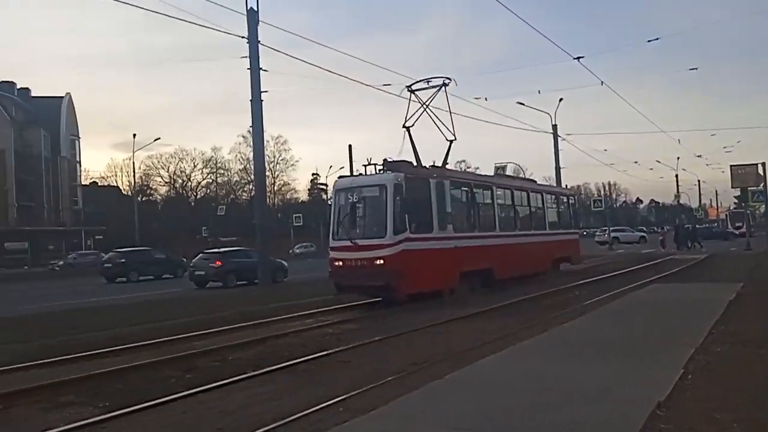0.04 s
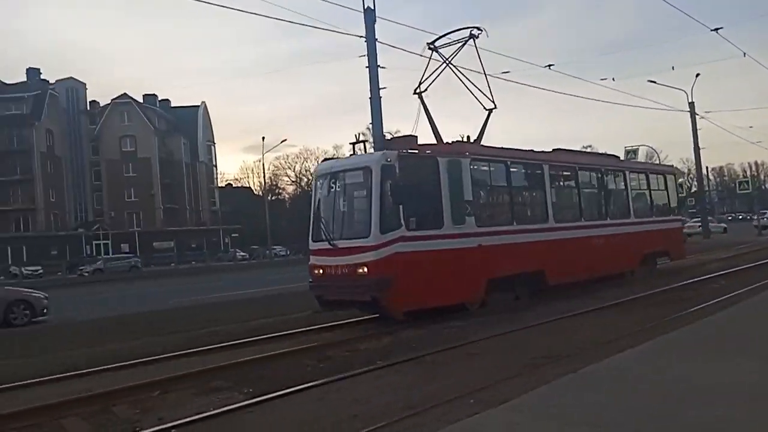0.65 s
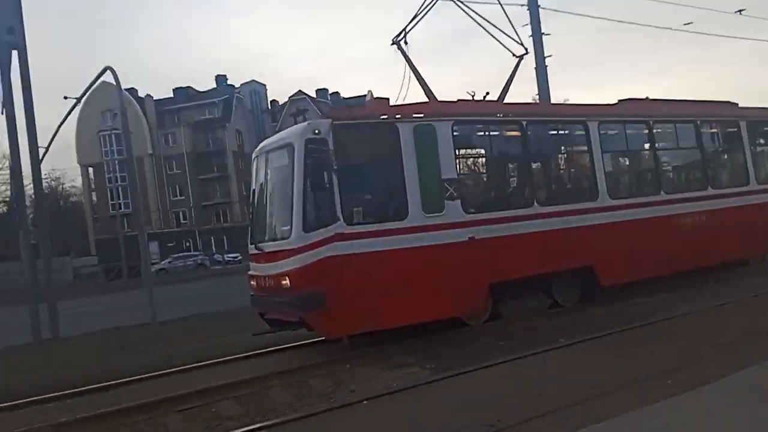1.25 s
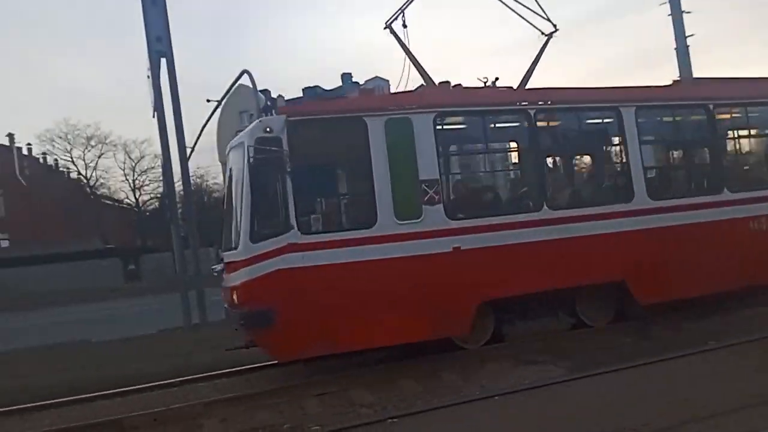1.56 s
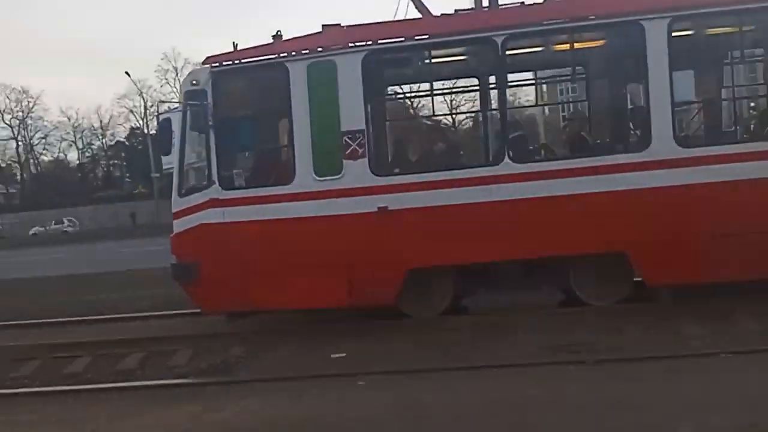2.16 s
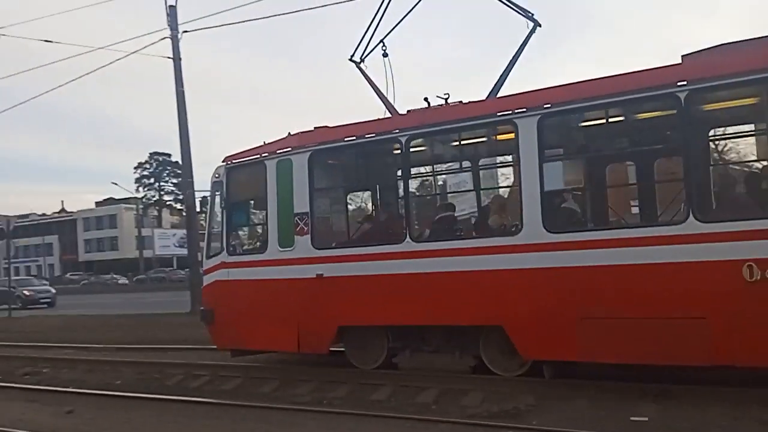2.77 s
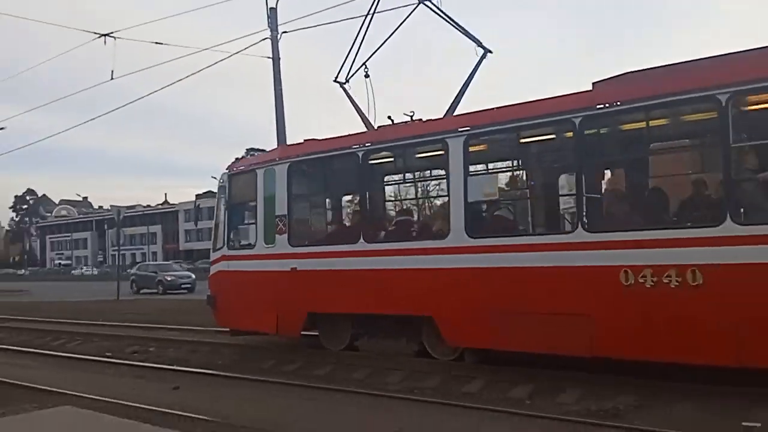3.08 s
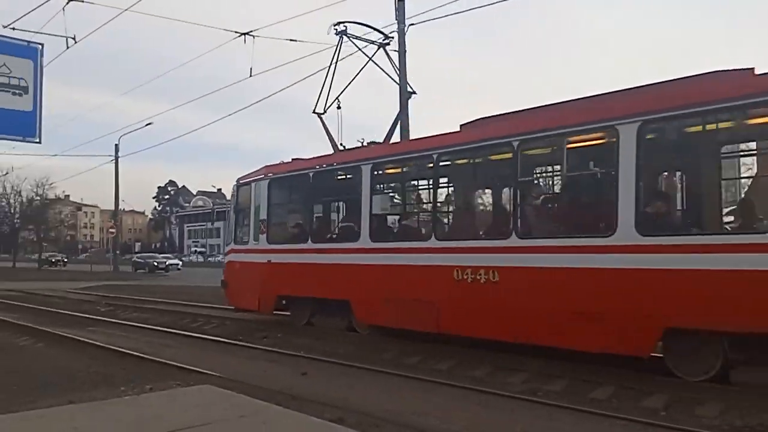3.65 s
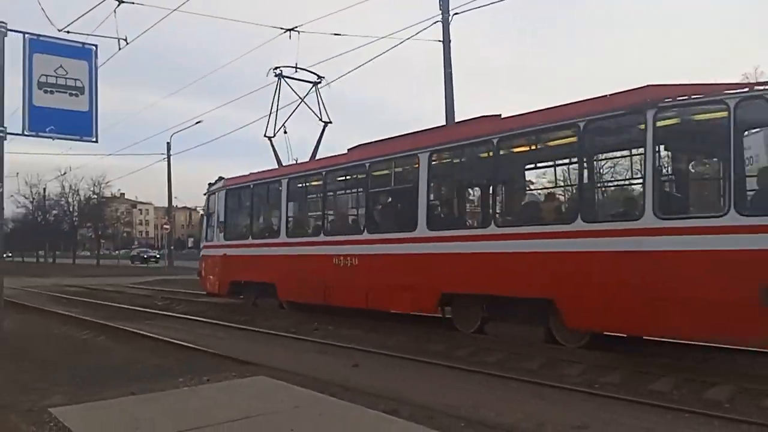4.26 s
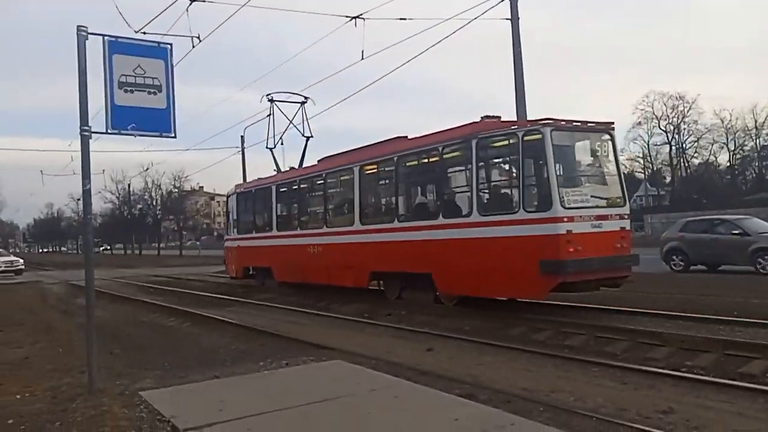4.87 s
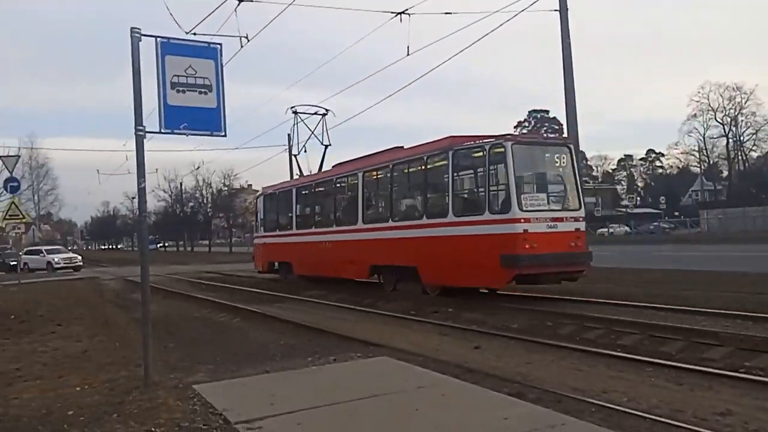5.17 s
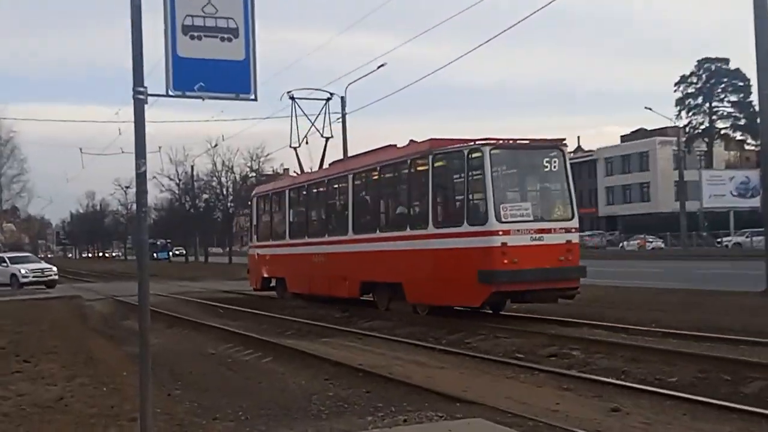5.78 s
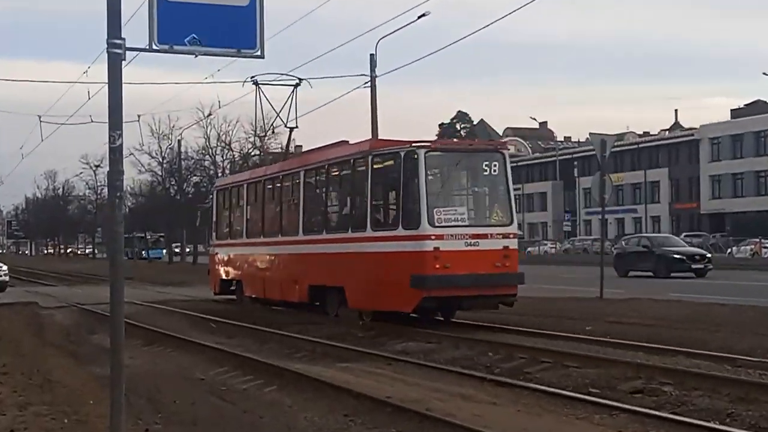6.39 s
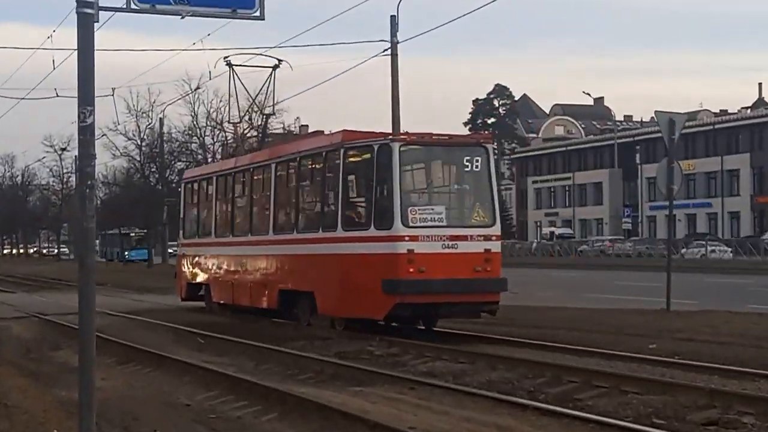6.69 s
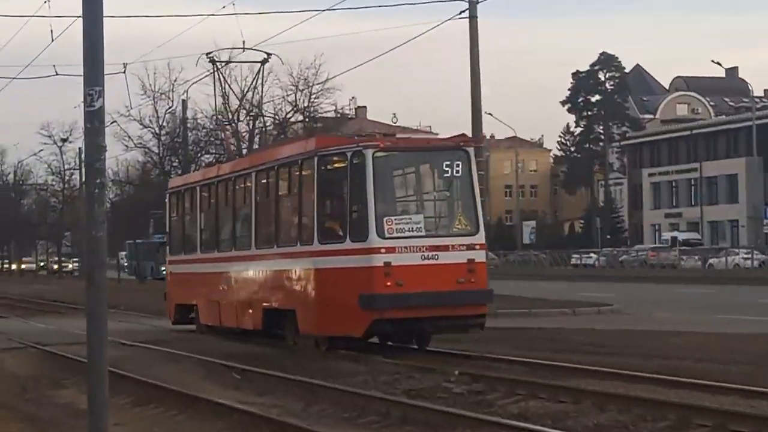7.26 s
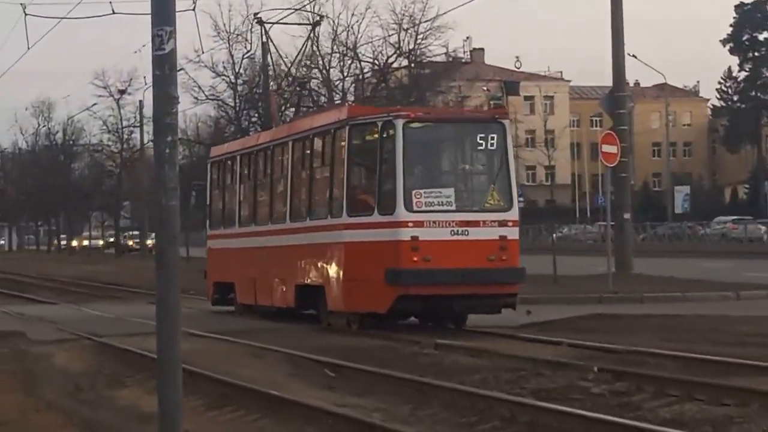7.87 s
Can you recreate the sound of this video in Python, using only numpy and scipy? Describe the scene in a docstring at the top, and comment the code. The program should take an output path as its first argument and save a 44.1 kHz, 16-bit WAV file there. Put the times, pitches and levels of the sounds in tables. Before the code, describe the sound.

Steel tram wheels rumble, ring and clack past on a street track, fading into distant road traffic.

```python
"""Tram passing on street track

One microphone in an open street, a few metres from the rails: a two-bogie tram rolls by and draws off.
Rough rail shakes the car body and sets the steel wheels ringing; their pitch sinks as the car passes.
Axles clack over rail joints, flanges rub and loose fittings chink. Road traffic lies far behind."""
import sys
import numpy as np
from scipy import signal
from scipy.fft import rfft, irfft, next_fast_len
from scipy.io import wavfile
from scipy.ndimage import uniform_filter1d, map_coordinates

SR = 44100
rng = np.random.default_rng(int(sys.argv[2]) if len(sys.argv) > 2 else 0)


def to_wav(sig):
    """Store sig (one row per channel, or 1-D mono) as 16-bit WAV at the path in sys.argv[1].

    Samples outside -1..1 are clipped; the rate is SR.
    """
    pcm = np.clip(np.atleast_2d(sig), -1, 1) * 32767
    pcm = np.round(pcm).astype(np.int16)
    wavfile.write(sys.argv[1], SR, pcm.T)  # frames by channels


N = 349713
T = np.arange(N) / SR
PASS_S = 3.1  # the car is closest to the microphone

# rolling noise, following track state and distance: t/s, body rumble/dB, rail roar/dB, flange sizzle/dB
ROLLING_LEVELS = [(0, -34.5, -36.5, -39.5), (0.2, -30, -38.5, -43.5), (0.6, -31.5, -37.5, -44.5),
                  (0.9, -33.5, -39.5, -43), (1.08, -28.5, -39.5, -45), (1.45, -30, -41, -43),
                  (1.85, -33.5, -41.5, -44), (2.2, -29, -36, -42.5), (2.62, -36.5, -42, -47.5),
                  (3.1, -31.5, -38.5, -46.5), (3.48, -31, -43.5, -51), (3.65, -39.5, -44, -53),
                  (4.15, -34, -42.5, -51), (4.45, -39, -48, -56), (5.45, -42.5, -50, -55),
                  (5.9, -40, -47.5, -53), (6.7, -45, -48, -56), (7.93, -45.5, -48, -54)]
# spectrum of the rail under the rear bogie: f/Hz, level/dB
REAR_RAIL_SPECTRUM = [(200, -20), (510, -5.5), (620, 4), (780, 3), (1130, -5), (1330, -5), (1650, -1.5),
                      (2100, -6.5), (2350, -1.5), (2550, -13), (2950, -8.5), (3700, -22), (5000, -22.5),
                      (16000, -45)]
# spectrum of a thud through the car: f/Hz, level/dB
THUD_SPECTRUM = [(25, -23), (60, -25), (100, 4.5), (240, 6.5), (350, -0.5), (500, -9.5), (1000, -37),
                 (4000, -78)]
# resonances of a bogie frame: f/Hz, width/Hz, level/dB
FRAME_MODES = [(344, 49, 3.5), (609, 50, -2), (756, 33, 2), (866, 18, -0.5), (1057, 76, -4.5),
               (1167, 30, 1), (1480, 77, -4), (1657, 17, -5.5), (2090, 60, -3), (2325, 30, 0.5),
               (2500, 44, -5.5), (3080, 18, -33), (3220, 41, -13.5)]
# lowest wheel mode, split between the wheels: f/Hz, width/Hz, level/dB
LOW_WHEEL_MODES = [(1806, 53.6, -2.5), (1883, 111, -7.5), (1996, 155, -12.5)]
# high modes of the front wheels: f/Hz, width/Hz, level/dB
FRONT_RIM_MODES = [(3536, 25, -15.5), (4100, 60, -8), (4550, 16, -3.5), (5435, 54, 4), (5510, 120, 1.5),
                   (5680, 76, -6.5), (6180, 220, -4), (6270, 37, -9.5), (6600, 36, -5), (6800, 70, -9),
                   (7600, 66, -7)]


def amp(db):
    """Decibels to gain."""
    return 10 ** (np.asarray(db) / 20)


def unit(x):
    """Scale to rms 1."""
    return x / np.sqrt(np.mean(x ** 2) + 1e-20)


def curves(rows):
    """One value per sample for each column after the time."""
    times, *columns = np.transpose(rows)
    return [np.interp(T, times, column) for column in columns]


def wobble(rate):
    """A smooth random curve, rate knots a second."""
    knots = rng.standard_normal(int(T[-1] * rate) + 4)
    coarse = T[::100]
    return np.interp(T, coarse, map_coordinates(knots, [coarse * rate], order=3))


def white():
    """Fresh white noise."""
    return rng.standard_normal(N)


def band(points):
    """Gain against frequency from rows of f/Hz, level/dB."""
    hz, db = np.transpose(points)
    return lambda f: amp(np.interp(np.log(f + 1), np.log(hz), db))


def steel(modes, lo_hz, hi_hz):
    """Response of resonances that radiate only between two frequencies."""
    def response(f):
        ringing = sum((-1) ** k * amp(db) * 1j * f * width / (hz * hz - f * f + 1j * f * width)
                      for k, (hz, width, db) in enumerate(modes))
        return ringing / np.sqrt((1 + (lo_hz / (f + 1)) ** 16) * (1 + (f / hi_hz) ** 40))
    return response


def filtered(x, response):
    """Colour x, keeping the power of a white input."""
    size = next_fast_len(N + 8192)
    gain = response(np.fft.rfftfreq(size, 1 / SR))
    return irfft(rfft(x, size) * gain / np.sqrt(np.mean(abs(gain) ** 2)), size)[:N]


def blows(times, levels_db, rise, t60):
    """Bursts of noise that swell quickly and die away; rise and t60 in seconds."""
    power, t = np.zeros(N + SR), np.arange(SR // 2) / SR
    shape = (1 - np.exp(-t / rise)) * amp(-60 * t / t60)
    for s, db in zip(times, levels_db):
        power[round(s * SR):][:len(t)] += (amp(db) * shape / shape.max()) ** 2
    return np.sqrt(power[:N]) * white()


def spells(rows, attack, release):
    """Gain of sounds that swell, hold and die away; attack and release in seconds."""
    power = np.zeros(N)
    for start, length, db in rows:
        rise = 1 - np.exp(-np.maximum(T - start, 0) / attack)
        fall = np.exp(-np.maximum(T - start - length, 0) / release)
        power += (amp(db) * rise * fall) ** 2
    return np.sqrt(power)


def nearness(closest_s, length_s):
    """Gain of a passing source, one over its distance from the microphone."""
    return 1 / np.hypot(1, (T - closest_s) / length_s)


def doppler(x, mach=0.018, length_s=0.99):
    """Pitch is high on the approach and low once the car is past."""
    speed = 1 - mach * np.tanh((T - PASS_S) / length_s)
    return map_coordinates(x, [np.cumsum(speed)], order=3, mode="wrap")


def dulled(x, edge_hz, near_db, length_s):
    """The treble of the rail reaches the microphone only while the car is close."""
    low = signal.sosfiltfilt(signal.butter(4, edge_hz, fs=SR, output="sos"), x)
    return low + amp(near_db) * nearness(PASS_S, length_s) * (x - low)


def bogies(front, rear, swap_s=3.44, length_s=0.18):
    """The front bogie is the nearer one first, then the rear."""
    rear_share = (1 + np.tanh((T - swap_s) / length_s)) / 2
    return np.sqrt(1 - rear_share) * unit(front) + np.sqrt(rear_share) * unit(rear)


def turn_db(turn_s=0.257, heaviest_s=2.245):
    """Slightly uneven wheels bear down once a turn, most plainly at close range."""
    angle = 2 * np.pi * (T - heaviest_s) / turn_s
    return 2.5 * (np.cos(angle) + 0.3 * np.cos(2 * angle)) * nearness(closest_s=2.9, length_s=2.6) ** 2


def contact(rate, spread_db, share):
    """Force at the tread: fine roughness, with a share of the power in knocks on grit and pits."""
    hit = rng.random(N) < rate / SR
    roughness, knocks = white(), np.zeros(N)
    knocks[hit] = amp(spread_db * np.clip(roughness[hit], -2, 2))
    return np.sqrt(share) * unit(knocks - knocks.mean()) + np.sqrt(1 - share) * roughness


def wandering_modes(modes, flare_db, knock_rate):
    """The contact patch wanders over the tread, so each mode flares up and fades by itself."""
    out = np.zeros(N)
    for hz, width, db in modes:
        force = contact(rate=knock_rate, spread_db=4, share=0.6)
        ring = signal.lfilter(*signal.iirpeak(hz, hz / width, SR), force)
        out += amp(db + flare_db * wobble(22)) * unit(ring)
    return doppler(out)


def rolling():
    """Wheels on rough rail: the body rumbles, the rail roars, the bogie frames clatter."""
    # spectra of the car body, the rail under the front bogie and the frame's radiation: f/Hz, level/dB
    body_spectrum = [(20, -42), (40, -34), (60, -17), (80, 0.5), (110, 1), (160, -0.5), (200, 0.5),
                     (230, -11), (275, -5), (360, -8.5), (440, -16), (520, -41), (900, -34), (2000, -84)]
    front_rail_spectrum = [(200, -33), (480, -6), (720, 5), (1000, -12), (1250, -2), (1520, 0.5),
                           (2000, 3.5), (2300, -2.5), (2580, -9.5), (3150, -10.5), (3800, -22), (5000, -29),
                           (8000, -40), (16000, -49)]
    frame_radiation = [(200, -24), (500, 2.5), (2400, -1.5), (3800, -22), (8000, -50)]
    body_db, rail_db, _ = curves(ROLLING_LEVELS)
    load_db = turn_db() + wobble(24)  # the bouncing axle load drives all three
    rumble = unit(filtered(contact(rate=90, spread_db=2, share=0.2), band(body_spectrum)))
    front = filtered(contact(rate=160, spread_db=6.5, share=0.18), band(front_rail_spectrum))
    rear = filtered(contact(rate=160, spread_db=6.5, share=0.18), band(REAR_RAIL_SPECTRUM))
    roar = dulled(bogies(front, rear), edge_hz=2940, near_db=2, length_s=1.7)
    frame = wandering_modes(FRAME_MODES, flare_db=3.5, knock_rate=30)
    clatter = unit(filtered(frame, band(frame_radiation)))
    track = amp(-0.6) * roar + amp(-6) * clatter
    return amp(body_db + 1.05 * load_db) * rumble + amp(rail_db + 0.5 * load_db) * track


def wheel_ring():
    """The steel discs ring in their lowest mode and now and then sing out."""
    # steady ring: t/s, level/dB
    ring_levels = [(0, -38), (0.9, -38), (1.2, -38), (1.6, -37.5), (2.4, -37.5), (3.2, -40), (3.7, -51),
                   (5.6, -49), (6.5, -56), (7.7, -45), (7.93, -45.5)]
    # a wheel sings out: t/s, length/s, level/dB
    songs = [(0.09, 0.025, -33), (0.3, 0.028, -31.5), (0.66, 0.12, -34.5), (1.06, 0.06, -27),
             (1.17, 0.044, -25), (1.25, 0.17, -31.5), (1.65, 0.13, -32), (1.925, 0.042, -25),
             (2.1, 0.048, -31), (2.22, 0.045, -28), (2.52, 0.05, -33), (2.99, 0.036, -25),
             (3.18, 0.16, -37.5), (5.03, 0.042, -30), (5.43, 0.03, -49), (5.61, 0.073, -40.5),
             (5.97, 0.29, -44), (6.83, 0.3, -50.5), (7.62, 0.125, -44.5)]
    ring_db, = curves(ring_levels)
    force = contact(rate=60, spread_db=4, share=0.23)
    ring = filtered(force, steel(LOW_WHEEL_MODES, lo_hz=1650, hi_hz=2340))
    gain = np.hypot(amp(ring_db + 1.5 * wobble(15)), spells(songs, attack=0.0062, release=0.012))
    return gain * unit(doppler(ring))


def wheel_rasp():
    """Knocks at the tread make the discs rasp in their second mode."""
    # second wheel mode: f/Hz, width/Hz, level/dB
    second_modes = [(2026, 63, -2.5), (2266, 53, 4)]
    # the rasp flares up: t/s, length/s, level/dB
    rasps = [(0.18, 0.044, -38.5), (0.51, 0.066, -38), (0.97, 0.42, -37), (2.74, 0.097, -37),
             (2.99, 0.089, -38), (3.26, 0.055, -32.5), (3.82, 0.14, -46), (4.06, 0.27, -45.5),
             (7.02, 0.07, -52)]
    _, _, sizzle_db = curves(ROLLING_LEVELS)
    force = contact(rate=70, spread_db=5.5, share=0.53)
    rasp = filtered(force, steel(second_modes, lo_hz=1950, hi_hz=2580))
    gain = np.hypot(amp(sizzle_db - 2), spells(rasps, attack=0.004, release=0.012))
    return gain * unit(doppler(rasp))


def flanges():
    """Flanges rub along the rail head and sizzle in the wheels' high modes."""
    # spectra of the rubbing and of the high modes' radiation: f/Hz, level/dB
    rub_spectrum = [(2000, -45), (3900, -14.5), (4400, -6), (5000, 1), (5500, 2.5), (6000, -1), (6500, 2),
                    (7100, -4.5), (7600, -8), (8200, -43), (9000, -25), (9750, -13.5), (11000, -29.5),
                    (16000, -28)]
    rim_radiation = [(2900, -40), (3550, 3.5), (3850, -16), (4150, -1.5), (7900, 0), (8800, -35)]
    # high modes of the rear wheels: f/Hz, width/Hz, level/dB
    rear_rim_modes = [(4420, 140, -11), (5000, 37, -7.5), (5390, 35, 1.5), (5660, 56, 3.5),
                      (6200, 66, -0.5), (6430, 62, 1), (6640, 86, -6.5), (7430, 91, -7), (8200, 50, -23)]
    # spells of rubbing: t/s, length/s, level/dB
    rubs = [(0.07, 0.16, -44.5), (0.29, 0.28, -38.5), (0.7, 0.097, -39), (0.95, 0.19, -39.5),
            (1.17, 0.28, -37), (1.72, 0.054, -43), (1.92, 0.11, -35), (2.19, 0.077, -35.5),
            (2.48, 0.074, -36.5), (2.98, 0.18, -43.5), (3.26, 0.044, -41), (4.05, 0.07, -49),
            (4.22, 0.15, -46.5), (5.29, 0.088, -47.5), (5.9, 0.58, -54.5)]
    _, _, sizzle_db = curves(ROLLING_LEVELS)
    rub = unit(doppler(filtered(contact(rate=300, spread_db=6.5, share=0.17), band(rub_spectrum))))
    front = wandering_modes(FRONT_RIM_MODES, flare_db=3.5, knock_rate=35)
    rear = wandering_modes(rear_rim_modes, flare_db=3, knock_rate=46)
    rims = unit(filtered(bogies(front, rear), band(rim_radiation)))
    gain = np.hypot(amp(sizzle_db + 1 + 0.67 * turn_db()), spells(rubs, attack=0.0047, release=0.019))
    return gain * amp(1.3 * wobble(24)) * (amp(-3.5) * rims + amp(-7) * rub)


def shell():
    """The car shell hums as it nears, booms over rough track and thuds on its springs."""
    # spectra of the shell's hum and deep boom: f/Hz, level/dB
    hum_spectrum = [(100, -57), (195, -22), (218, -1.5), (231, 1.5), (248, -5), (290, -11.5), (360, -17.5),
                    (520, -46), (1000, -75)]
    boom_spectrum = [(20, -33), (38, -24), (54, -6), (64, 3.5), (85, -17), (150, -39), (400, -83)]
    # the shell swells into resonance: t/s, length/s, level/dB
    swells = [(1.97, 0.049, -30), (2.21, 0.073, -24), (3.22, 0.12, -27.5), (4.03, 0.029, -32),
              (4.85, 0.082, -33.5), (5.08, 0.22, -34), (5.45, 0.1, -36)]
    # the body jolts on its springs: t/s, level/dB
    jolts = [(1.04, -22), (1.571, -26.5), (1.73, -37), (2.11, -29.5), (2.39, -26), (2.71, -30),
             (3.12, -28.5), (3.47, -39), (4.24, -32.5), (5.75, -40.5), (5.94, -37)]
    passing_gain = amp(-33.5 + 0.42 * turn_db()) * nearness(closest_s=2.55, length_s=1.05)
    hum_gain = np.hypot(passing_gain, spells(swells, attack=0.013, release=0.026))
    hum = unit(doppler(filtered(white(), band(hum_spectrum))))
    boom_gain = amp(-39.5 + 2.3 * wobble(7)) * nearness(closest_s=1.54, length_s=0.52)
    boom = unit(filtered(white(), band(boom_spectrum)))
    thuds = filtered(blows(*np.transpose(jolts), rise=0.017, t60=0.21), band(THUD_SPECTRUM))
    return hum_gain * hum + boom_gain * boom + thuds


def running_gear():
    """A rough low drone from the driven axles, loudest on the approach."""
    # drone at the microphone: t/s, level/dB
    drone_levels = [(0, -33), (.2, -30), (.55, -27.5), (.8, -28), (.95, -39), (1.15, -31), (1.5, -43),
                    (3.7, -45), (7.93, -59.5)]
    # its spectrum: f/Hz, level/dB
    drone_spectrum = [(100, -15), (270, -5.5), (330, 3), (390, 1), (470, -7.5), (570, -23), (1200, -81)]
    level_db, = curves(drone_levels)
    return amp(level_db) * unit(doppler(filtered(white(), band(drone_spectrum))))


def scrape():
    """Sliding steel gives a thin hiss; the harder a flange bites, the more it flutters."""
    # a flange bites and slides: t/s, length/s, level/dB
    slides = [(0.0, 0.25, -56), (2.2, 0.15, -52), (3.0, 0.11, -42.5)]
    # spectrum of sliding steel: f/Hz, level/dB
    hiss_spectrum = [(3000, -24), (6000, 17), (8500, 2), (10000, -4.5), (13000, -10.5), (14300, -4),
                     (15400, 4), (16500, -4.5)]
    _, _, sizzle_db = curves(ROLLING_LEVELS)
    alongside = np.exp(-(T - 3.47) ** 2)  # the rear bogie's open side faces the microphone
    light = amp(sizzle_db - 15 + 10 * alongside)
    biting = spells(slides, attack=0.013, release=0.041)
    gain = np.hypot(light, biting)
    flutter_db = (3.2 + 1.8 * biting / gain) * wobble(55)
    return gain * amp(flutter_db + 0.48 * turn_db()) * unit(filtered(white(), band(hiss_spectrum)))


def traffic():
    """Distant tyres on the road behind the track."""
    # traffic at the microphone: t/s, level/dB
    road_levels = [(0, -43.5), (3, -44.5), (4.7, -50), (5.8, -45), (6.6, -45.5), (7.93, -42)]
    # its spectrum: f/Hz, level/dB
    road_spectrum = [(25, -29), (70, 0.5), (210, 6.5), (350, 1), (510, -6), (750, -2.5), (990, 2),
                     (1300, -7), (1800, -13.5), (2500, -20.5), (3000, -15.5), (3800, -23.5), (6200, -30.5),
                     (8200, -42), (15000, -41.5)]
    level_db, = curves(road_levels)
    return amp(level_db + 1.3 * wobble(1.39)) * unit(filtered(white(), band(road_spectrum)))


def chinks(rows, t60, click_db):
    """Small steel parts: a tiny click around their pitch, then a close pair of modes rings out."""
    out, t = np.zeros(N + SR), np.arange(SR // 5) / SR
    ring_shape = (1 - np.exp(-t / 0.0011)) * amp(-60 * t / t60)
    click_shape = amp(click_db - 60 * t / 0.028)
    for s, db, hz in rows:
        phase = 2 * np.pi * hz * t
        pair = np.sin(phase) + 0.73 * np.sin(phase * (1 + 0.011 * rng.standard_normal()))
        low_noise = uniform_filter1d(uniform_filter1d(rng.standard_normal(len(t)), size=9), size=12)
        click = np.cos(phase) * unit(low_noise)
        out[round(s * SR):][:len(t)] += amp(db) * (pair * ring_shape + click * click_shape)
    return out[:N]


def fittings():
    """Loose steel parts chink under the car; the harder the wheels sizzle, the louder they jingle."""
    # single ticks of loose fittings: t/s, level/dB, f/Hz
    ticks = [(.295, -51, 9500), (.53, -38, 4550), (1.345, -28, 5640), (1.435, -39, 4580), (1.54, -35, 4580),
             (1.935, -41.5, 7750), (1.975, -30, 5500), (2.005, -35, 7720), (2.497, -42.5, 10000),
             (2.53, -34, 5400), (3.098, -53, 9700), (3.542, -53, 8250), (4.066, -54, 10350),
             (4.07, -42.5, 4830), (4.1, -42, 7500), (4.228, -49, 7900), (4.34, -47, 7900),
             (5.018, -56, 8200), (6.395, -42, 3000), (6.408, -38, 2244), (7.135, -39, 2300)]
    _, _, sizzle_db = curves(ROLLING_LEVELS)
    when, strength, smallness = rng.random((300, 3)).T
    times = when * T[-1]
    hz = 5200 * 2.35 ** smallness
    screened_db = 4 * np.clip(abs(times - PASS_S) - 1, 0, 2)  # the underside is open only from alongside
    db = np.interp(times, T, sizzle_db) - 6 + 5 * strength - 18 * smallness - screened_db
    return chinks(ticks, t60=0.1, click_db=-4) + chinks(zip(times, db, hz), t60=0.17, click_db=1)


def joints():
    """An axle drops into the gap: the rail cracks, the frame clanks and thuds, the wheel rings on."""
    # axles over joints and rough welds, in relative levels: t/s, clank/dB, thud/dB, wheel ring/dB
    crossings = [(0.184, -34.5, -29.5, -26.5), (.509, -37, -24, -24), (0.944, -34.5, -34, -22.5),
                 (0.998, -31.5, -35, -23.5), (1.921, -35.5, -33, -21), (1.984, -33.5, -27, -21),
                 (2.212, -32.5, -27, -28), (2.479, -29.5, -23.5, -24.5), (2.986, -31.5, -25, -32),
                 (3.265, -27.5, -23.5, -24), (3.537, -31.5, -31, -34.5), (4.047, -31.5, -28, -45),
                 (4.325, -31, -33, -34), (5.026, -37.5, -27, -29.5), (5.294, -35.5, -34, -42),
                 (5.348, -38.5, -40, -47), (6.402, -39.5, -54, -53), (6.671, -44, -39, -43)]
    times, clank_db, thud_db, ring_db = np.transpose(crossings)
    crack = filtered(blows(times, clank_db, rise=0.00072, t60=0.18), band(REAR_RAIL_SPECTRUM))
    clank = filtered(blows(times, clank_db + 3.5, rise=0.00026, t60=0.037),
                     steel(FRAME_MODES, lo_hz=250, hi_hz=3740))
    thud = filtered(blows(times, thud_db, rise=0.0078, t60=0.13), band(THUD_SPECTRUM))
    ring = filtered(blows(times, ring_db - 4.5, rise=0.0023, t60=0.14),
                    steel(LOW_WHEEL_MODES, lo_hz=1650, hi_hz=2370))
    rim = filtered(blows(times, ring_db - 19, rise=0.0042, t60=0.3),
                   steel(FRONT_RIM_MODES, lo_hz=3400, hi_hz=7800))
    return dulled(crack, edge_hz=2700, near_db=1.5, length_s=2.4) + clank + thud + ring + rim


def pings():
    """A pit in the rail gives the wheel one clean tap."""
    # wheels strike small pits: t/s, relative level/dB
    pits = [(1.642, -27.5), (2.4, -30), (3.749, -39.5), (4.454, -40.5), (4.95, -41.5), (5.171, -37.5)]
    taps = np.zeros(N)
    for s, db in pits:
        taps[round(s * SR)] = amp(db + 27)
    return filtered(taps, steel(LOW_WHEEL_MODES, lo_hz=1650, hi_hz=2290))


def scene():
    """The open street in mono: the tram close by, the traffic far off."""
    tram = rolling() + wheel_ring() + wheel_rasp() + flanges() + shell() + running_gear() + scrape()
    knocks = joints() + pings() + fittings()
    return (tram + knocks + traffic())[None]


def record(dry, top_hz=15750):
    """The microphone chain keeps nothing above its band limit."""
    return irfft(rfft(dry) * (np.fft.rfftfreq(N, 1 / SR) < top_hz), N)


dry = scene()
out = record(dry)
to_wav(out)
```